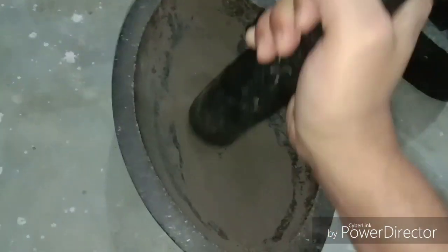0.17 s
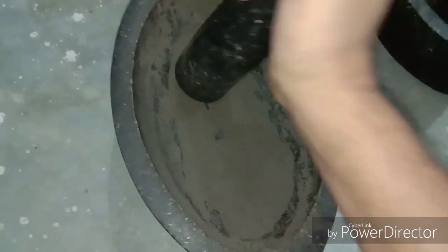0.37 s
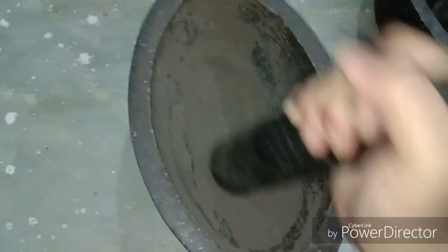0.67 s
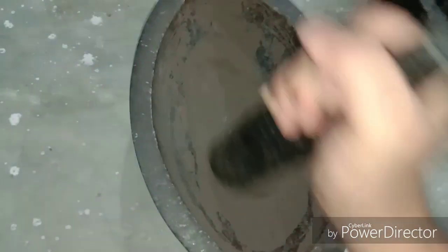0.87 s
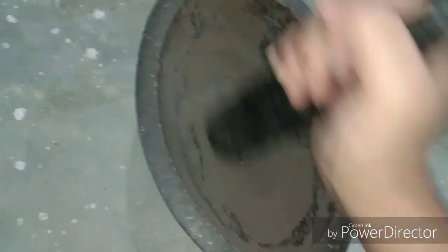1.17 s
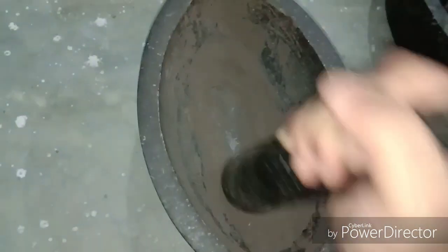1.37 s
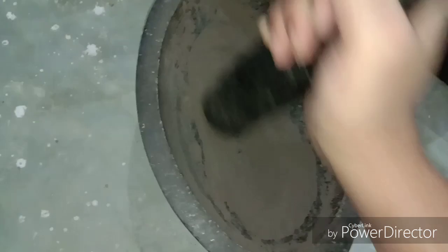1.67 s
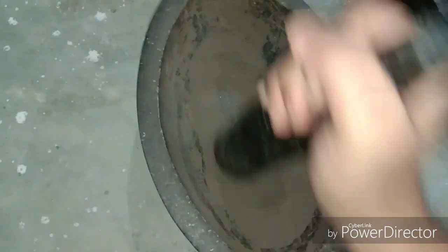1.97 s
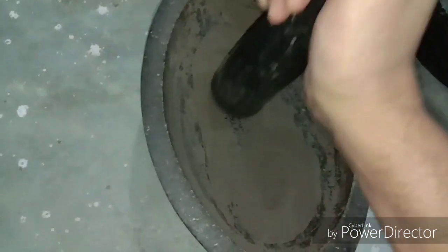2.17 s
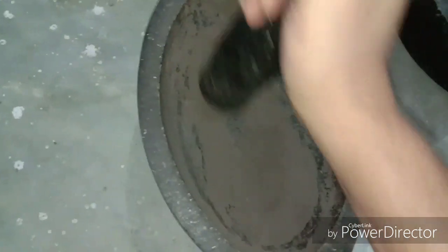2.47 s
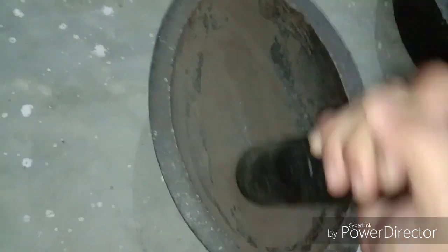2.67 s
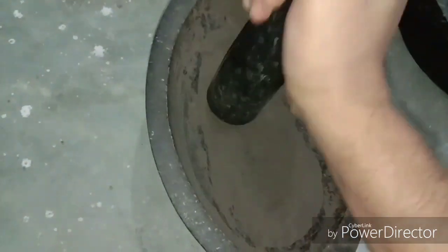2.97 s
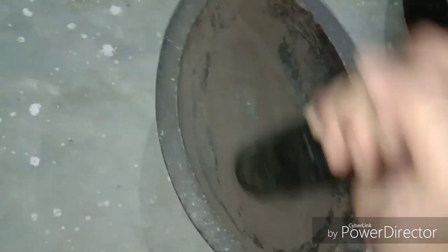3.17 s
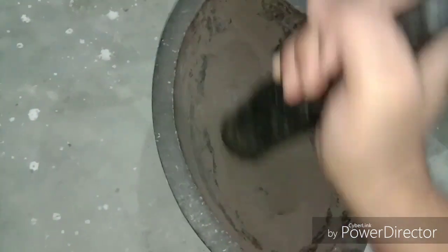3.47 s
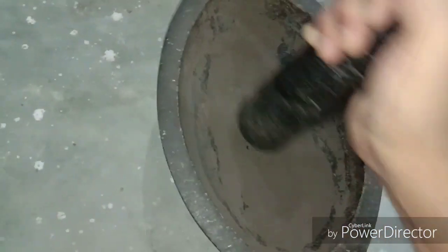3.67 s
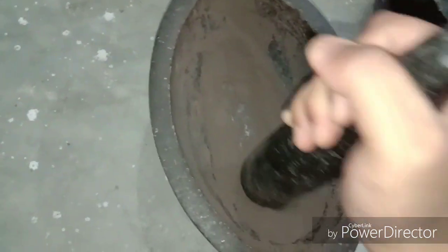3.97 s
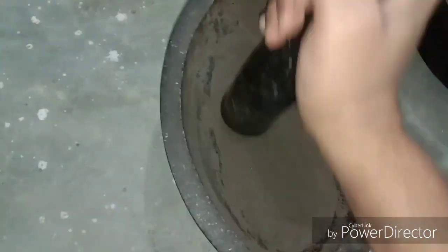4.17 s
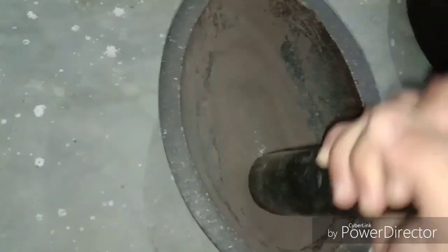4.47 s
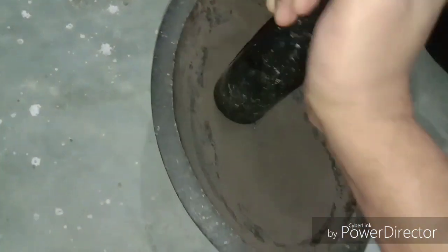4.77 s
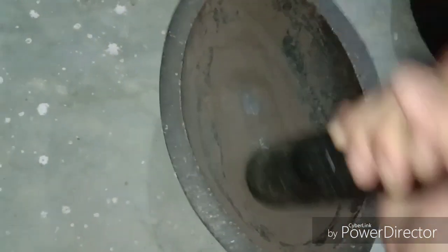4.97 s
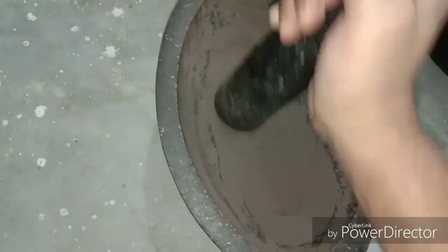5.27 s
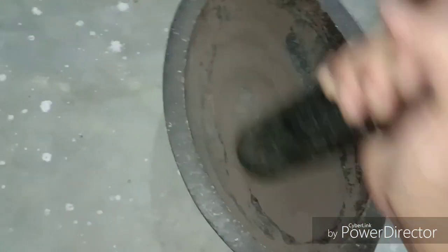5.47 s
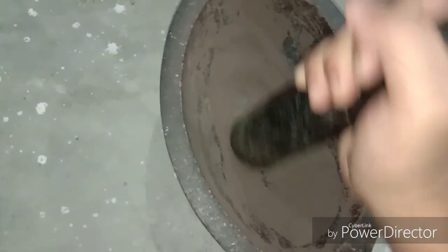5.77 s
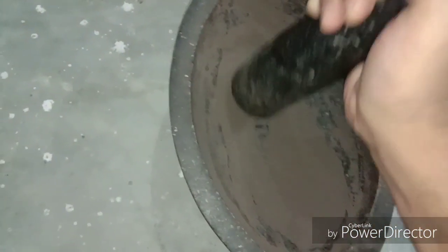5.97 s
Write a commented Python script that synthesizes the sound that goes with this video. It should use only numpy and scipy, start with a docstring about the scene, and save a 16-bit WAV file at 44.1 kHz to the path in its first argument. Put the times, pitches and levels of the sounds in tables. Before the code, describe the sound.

A heavy stone pestle scrapes to and fro through fine powder in a stone mortar, the bowl rumbling and knocking on the floor.

```python
"""In a small room with a hard floor, close to the microphones, a stone pestle works in a large stone mortar.
It goes to and fro through fine powder: dense random grains scrape, and drive resonances of the stone.
Bumps rumble through the heavy bowl, which also rocks and knocks, often in pairs, as short pushes with echoes.
Single low rings are decaying sines; a few grains snap and one airy hiss passes, both as shaped noise.
Behind lie a faint narrow band of high whine, thin tones that come and go, and a low hum."""
import sys
import numpy as np
from scipy import signal
from scipy.fft import rfft, irfft, next_fast_len
from scipy.io import wavfile
from scipy.ndimage import uniform_filter1d, map_coordinates

SR = 44100
rng = np.random.default_rng(int(sys.argv[2]) if len(sys.argv) > 2 else 0)


def transcribe(signal):
    """Save signal, clipped to [-1, 1], as a 16-bit WAV file at the path in sys.argv[1]."""
    frames = np.atleast_2d(signal).T
    limited = np.clip(frames, -1, 1)
    pcm = np.round(limited * 32767).astype(np.int16)
    wavfile.write(sys.argv[1], SR, pcm)


N = 269892  # length in samples

# landings of the rocking bowl on the floor; levels ahead of a common trim, and the hardness of
# the contact as a tilt of the upper range: [t/s, level/dB, hardness/dB]
BOWL_KNOCKS = [(1.04, -38, -14), (1.167, -31, -12), (1.214, -31, -14), (1.689, -30.5, -13.5),
               (1.738, -38, -2), (2.4265, -34.5, -3), (2.47, -40.5, -24.5), (2.612, -42.5, -16),
               (3.117, -29, 2.5), (3.165, -29.5, -12), (3.202, -33, -8.5), (4.315, -29, -3.5),
               (4.36, -29.5, -19.5), (4.875, -28.5, -7), (4.925, -30.5, -9.5), (5.452, -31, 6.5),
               (5.507, -29.5, -4.5)]
# low modes of bowl, floor and room, levels relative: [f/Hz, level/dB, t60/s]
LOW_MODES = [(118.5, 7, 1), (128, -10.5, 0.43), (160.5, 0.5, 0.95), (197, -23, 0.25), (233.4, 0, 0.44),
             (261.9, 5, 0.71), (296.5, -12, 0.15), (394.4, -8.5, 0.45), (503.8, -10.5, 0.22),
             (574.5, -4.5, 0.19), (645.4, -15, .25), (726, -12.5, 0.081)]
# strokes of the pestle, to and fro; t is the moment of full speed, levels ahead of the trims:
# [t/s, run-up/s, hold/s, scrape level/dB, coarse powder level/dB, boom level/dB, judder level/dB]
PESTLE_STROKES = [(0.108, 0.096, 0.066, -70, -86.5, -66.5, -62.5),
                  (0.665, 0.088, 0.091, -66.5, -82.5, -52, -54),
                  (0.943, 0.041, 0.084, -64.5, -74.5, -52.5, -54.5),
                  (1.203, .04, 0.094, -65.5, -78, -46, -51.5),
                  (1.497, 0.083, 0.093, -64.5, -73, -49.5, -51.5),
                  (1.747, 0.035, 0.099, -64, -73, -55, -51.5), (2.034, 0.071, 0.072, -65, -71, -50, -52.5),
                  (2.607, 0.11, 0.12, -64.5, -78, -58.5, -54.5),
                  (2.9, 0.044, 0.11, -64.5, -73.5, -49.5, -53.5), (3.165, 0.022, 0.1, -66, -75, -48, -49.5),
                  (3.467, 0.054, 0.099, -65.5, -75, -50, -53.5), (3.715, 0.091, .05, -100, -88, -82, -72),
                  (4.109, 0.12, 0.1, -65.5, -80, -60.5, -59), (4.391, 0.02, .085, -64, -73.5, -49.5, -51),
                  (4.655, 0.036, 0.13, -64, -71.5, -51.5, -53),
                  (4.927, 0.022, 0.14, -64.5, -73, -44.5, -53),
                  (5.217, 0.041, 0.11, -63.5, -73.5, -48.5, -52),
                  (5.485, 0.023, 0.13, -66.5, -74.5, -49.5, -50.5),
                  (5.786, 0.073, 0.093, -68, -76.5, -56, -56)]


def amp(db):
    """Decibels to gain."""
    return 10 ** (np.asarray(db) / 20)


def unit(x):
    """Scale to rms 1."""
    return x / np.sqrt(np.mean(x ** 2) + 1e-20)


def along(points, hz):
    """(Hz, value) points read on a log frequency axis."""
    f, v = np.transpose(points)
    return np.interp(np.log(hz + 1), np.log(f + 1), v)


def curves(rows):
    """One value per sample for each column after the time."""
    s, *cols = np.transpose(rows)
    return [np.interp(np.arange(N) / SR, s, c) for c in cols]


def wobble(rate):
    """A smooth random curve, rate knots a second."""
    knots = rng.standard_normal(int(N * rate / SR) + 4)
    return map_coordinates(knots, [np.arange(N) * rate / SR])


def filtered(x, response):
    """x with its spectrum multiplied by a response, a function of frequency."""
    m = next_fast_len(N + SR // 2)
    return irfft(rfft(x, m) * response(np.fft.rfftfreq(m, 1 / SR)), m)[..., :N]


def coloured(x, spectrum):
    """x shaped by a dB curve over frequency, at rms 1."""
    return unit(filtered(x, lambda hz: amp(along(spectrum, hz))))


def ringing(x, modes):
    """x through a set of (Hz, width Hz, dB) resonances side by side, at rms 1."""
    def response(f):
        return sum(amp(db) * 1j * f * width / (hz * hz - f * f + 1j * f * width) for hz, width, db in modes)
    return unit(filtered(x, response))


def pulse(gain_db):
    """The most compact causal pulse with the given dB spectrum (minimum phase, by the cepstrum)."""
    cepstrum = irfft(np.log(amp(gain_db)))
    half = len(cepstrum) // 2
    fold = np.r_[1, np.full(half - 1, 2), 1, np.zeros(half - 1)]
    return irfft(np.exp(rfft(cepstrum * fold)))


def grains(rate, scatter_db):
    """Tiny impacts at random moments, rate a second on average, of random sign and log-normal size."""
    struck = rng.random(N) < rate / SR
    sign = np.sign(rng.standard_normal(N))
    return unit(struck * sign * amp(scatter_db * rng.standard_normal(N)))


def steadied(x, span):
    """x with its swells longer than span seconds evened out."""
    power = uniform_filter1d(x ** 2, max(int(span * SR), 1))
    return x / np.sqrt(np.abs(power) + 1e-4)


def patchy(x, depth_db=4.5):
    """x with random patches of gain, a few hundred Hz wide and some 30 ms long, at rms 1."""
    z = signal.stft(x, nperseg=512)[2]
    across_pitch = uniform_filter1d(rng.standard_normal(z.shape), size=3, axis=0)
    field = uniform_filter1d(across_pitch, size=5, axis=1)
    return unit(signal.istft(z * amp(depth_db * unit(field)), nperseg=512)[1][:N])


def together(levels):
    """Unrelated sounds add in power."""
    return np.sqrt(sum(level ** 2 for level in levels) + 1e-20)


def swell(s, rise, hold, fall_db_per_s, sag_db_per_s=0, run_up_db=20):
    """A gain that climbs by run_up_db to 1 at time s, sags while held, then falls away."""
    gain = np.zeros(N)
    near = np.arange(max(int((s - .5) * SR), 0), min(int((s + 1) * SR), N))
    t = near / SR - s
    climb_db = run_up_db * np.minimum(t, 0) / rise
    sag_db = sag_db_per_s * np.maximum(t, 0)
    fall_db = fall_db_per_s * np.maximum(t - hold, 0)
    gain[near] = amp(climb_db - sag_db - fall_db)
    return gain


def tail():
    """Diffuse room sound: half a second of noise, each frequency dying at its own speed, of energy 1."""
    # how long the small room rings on: [f/Hz, t60/s]
    room_decay = [(120, 0.46), (300, 1), (800, 0.12), (4000, 0.21), (12000, 0.032)]
    hz, t, z = signal.stft(rng.standard_normal(SR // 2), SR, nperseg=256)
    fading = amp(-60 * t / along(room_decay, hz)[:, None])
    decay = signal.istft(z * fading, SR, nperseg=256)[1][:SR // 2]
    return decay / np.linalg.norm(decay)


def tone(hz, waver_hz, waver_rate, fade_db, fade_rate):
    """A thin sine of rms 1 whose pitch and level wander at random."""
    phase = 2 * np.pi * np.cumsum(hz + waver_hz * wobble(waver_rate)) / SR
    return unit(amp(fade_db * np.tanh(wobble(fade_rate))) * np.sin(phase))


def background(whine_db=-73.0, floor_db=-74.5):
    """Narrow-band noise for the high whine, wandering sines, and shaped noise for the room's low hum."""
    # colour of the high whine: [f/Hz, level/dB]
    whine_band = [(4800, -20.5), (5450, -18.5), (5700, -3), (5950, 0.5), (6160, 5), (6330, -2.5),
                  (6520, -11), (7000, -56)]
    # thin tones of nearly fixed pitch whose level comes and goes: [f/Hz, level/dB]
    thin_tones = [(164, -74.5), (1529, -100), (6162, -82.5), (15110, -99)]
    # faint high tones that flicker in and out: [f/Hz, level/dB]
    flickering_tones = [(2590, -101), (2780, -96), (2875, -100), (3060, -99), (3180, -96.5), (3225, -92.5),
                        (3350, -101)]
    # colour of the room's hum: [f/Hz, level/dB]
    room_floor = [(25, -41), (70, -15.5), (120, -1.5), (165, -6), (210, -15.5), (310, -25.5), (600, -28.5),
                  (1200, -34), (2200, -37), (3000, -38), (3600, -50), (5000, -46.5), (7000, -30.5),
                  (8500, -39), (14000, -38.5), (15200, -37.5)]
    whine = amp(whine_db + 1.2 * wobble(11.0)) * coloured(rng.standard_normal(N), whine_band)
    thin = sum(amp(db) * tone(hz, waver_hz=4, waver_rate=25, fade_db=7.5, fade_rate=7.8)
               for hz, db in thin_tones)
    flicker = sum(amp(db) * tone(hz, waver_hz=32.7, waver_rate=130, fade_db=11, fade_rate=16)
                  for hz, db in flickering_tones)
    hum = amp(floor_db) * coloured(rng.standard_normal(N), room_floor)
    return whine + thin + flicker + hum


def hiss():
    """One light, ragged, very high hiss early on: two bands of patchy noise under drawn levels."""
    # course of the hiss: [t/s, body level/dB, sizzle level/dB]
    hiss_course = [(.5, -115, -120), (.54, -80.5, -105), (.66, -81, -82), (.71, -75, -59.5),
                   (.76, -73.5, -58), (.81, -81, -73), (.88, -86, -103), (.95, -115, -120)]
    # colour of its body: [f/Hz, level/dB]
    airy_band = [(5000, -31), (7000, -10), (8100, -2), (8900, -12.5), (10400, -20), (11500, -35),
                 (13000, -12), (15000, -48)]
    # colour of its sizzle: [f/Hz, level/dB]
    sizzle_band = [(11500, -30), (13100, -27), (13400, -29), (14500, -4), (15200, -9)]
    body_db, sizzle_db = curves(hiss_course)
    body = amp(body_db) * patchy(coloured(rng.standard_normal(N), airy_band))
    sizzle = amp(sizzle_db) * patchy(coloured(rng.standard_normal(N), sizzle_band))
    return body + sizzle


def snaps(t60=0.048):
    """A single hard grain bursts under the tip: a short spray of noise that starts at once and dies (t60 in s)."""
    # moments of bursting: [t/s, level/dB]
    bursts = [(2.042, -60), (4.68, -59), (5.342, -62)]
    # colour of the spray: [f/Hz, level/dB]
    spray_colour = [(1500, -29), (3500, -6), (4400, 4), (5400, 3), (6700, 11), (7300, -10), (8200, -33),
                    (14000, -35)]
    t = np.arange(N) / SR
    level = sum((t >= s) * amp(db - 60 * np.abs(t - s) / t60) for s, db in bursts)
    return level * coloured(rng.standard_normal(N), spray_colour)


def low_rings(attack_cycles=0.55):
    """Single low rings: each is one decaying sine with a rounded onset."""
    # from faint nudges to a short strong thump that is part of the knock at 2.43 s:
    # [t/s, level/dB, f/Hz, t60/s]
    single_rings = [(0.113, -48.5, 127, 0.26), (0.488, -46.5, 119.2, 0.58), (0.523, -48.5, 403, 0.082),
                    (0.656, -39.5, 310, 0.043), (0.941, -50.5, 249, 0.061), (1.497, -35.5, 130.4, 0.27),
                    (2.042, -39.5, 129, 0.55), (2.403, -43.5, 122, 0.23), (2.429, -24, 342, 0.025),
                    (3.505, -43, 126, 0.29), (3.972, -44.5, 128.3, 0.77), (3.983, -52.5, 323.5, 0.32)]
    out, t = np.zeros(N + SR), np.arange(SR // 2) / SR
    for s, db, hz, t60 in single_rings:
        onset = (1 - np.exp(-t * hz / attack_cycles)) ** 2
        out[round(s * SR):][:len(t)] += amp(db - 60 * t / t60) * onset * np.sin(2 * np.pi * hz * t)
    return out[:N]


def knock(hardness_db, ring_db=-40, room_db=-6, hard_hz=800, soft_hz=220, usual_db=-12):
    """One blow of peak 1: a short push, its echoes off near surfaces, the low modes and the room."""
    # nearby surfaces, gain relative to the direct sound: [delay/s, gain]
    near_surfaces = [(.0031, 0.69), (.0082, 0.51), (.0155, 0.31), (.0232, 0.11), (.031, .22), (.0385, 0.1)]
    # colour of the push at usual hardness: [f/Hz, level/dB]
    thud_colour = [(30, -26.5), (70, -19), (120, -9.5), (260, 3), (450, 6.5), (720, 2), (880, -1),
                   (1050, -34), (1400, -43.5), (2200, -54), (4000, -81)]
    t = np.arange(SR // 2) / SR
    answer = amp(room_db) * tail() * (1 - np.exp(-t / 0.0074))  # the diffuse sound builds up
    for hz, db, t60 in LOW_MODES:
        strength = amp(ring_db) * amp(db + rng.normal(0, 1.8) - 60 * t / t60)
        answer += strength * np.cos(2 * np.pi * hz * t)
    answer[0] += 1  # direct sound
    for delay, gain in near_surfaces:
        answer[round(delay * SR)] += gain
    hz = np.fft.rfftfreq(4096, 1 / SR)
    # a softer contact lasts longer and loses its upper range
    tilt_db = along([(soft_hz, 0), (hard_hz, hardness_db - usual_db)], hz)
    push = pulse(along(thud_colour, hz) + tilt_db)
    blow = signal.fftconvolve(answer, push)[:len(t)]
    return blow / np.abs(blow).max()


def rocking(knock_db=-1.5, lag=.002):
    """The bowl tips and lands on the floor: one blow for each landing."""
    out = np.zeros(N + SR)
    for s, db, hardness_db in BOWL_KNOCKS:
        blow = amp(db + knock_db) * knock(hardness_db)
        out[round((s + lag) * SR):][:len(blow)] += blow
    return out[:N]


def tipping(dip_db=9, lead=0.0012, length=0.012):
    """Gain of the rumble: the bowl is off the floor for an instant around each knock (lead, length in s)."""
    t = np.arange(N) / SR
    lifted = sum(np.exp(-((t - s + lead) / length) ** 2) for s, db, hardness_db in BOWL_KNOCKS)
    return amp(-dip_db * lifted)


def shaking(spectrum, ring_db):
    """Bumps of the tip, heard directly and through the low modes."""
    bumps = grains(rate=700, scatter_db=3.0)
    modes = [(hz, np.log(1000) / np.pi / t60, db) for hz, db, t60 in LOW_MODES]  # t60 to width in Hz
    through_bowl = amp(ring_db) * coloured(ringing(bumps, modes), spectrum)
    return steadied(coloured(bumps, spectrum) + through_bowl, span=0.027)


def pressing(turn_dip_db=3.5, turn_half_s=0.034, press_on_s=0.012, shudder_rise_s=0.012):
    """Levels of boom and judder: every stroke and every drop of weight shakes the bowl."""
    # the arm's weight drops on the bowl and leaves it shuddering, levels ahead of the trims:
    # [t/s, hold/s, boom level/dB, judder level/dB]
    weight_drops = [(0.503, 0.093, -58.5, -65), (1.062, 0.075, -50.5, -55), (1.167, 0.098, -53, -47),
                    (1.676, 0.077, -47, -46.5), (2.425, 0.02, -43.5, -44.5), (3.108, 0.07, -46, -41),
                    (3.967, 0.023, -54.5, -61.5), (4.297, 0.14, -46.5, -44.5), (4.886, 0.084, -48, -44),
                    (5.442, 0.078, -49, -41.5), (5.872, 0.016, -58.5, -71)]
    ease_db_per_s, settle_db_per_s = 112.5, 87.5  # fall of the judder after a stroke, after a drop
    boom_lingers = 1.47  # the boom takes this many times longer to die than the judder
    t = np.arange(N) / SR
    # the pestle stands still for an instant before each stroke
    still = sum(np.exp(-((t - s + rise) / turn_half_s) ** 2) for s, rise, *_ in PESTLE_STROKES)
    moving = amp(-turn_dip_db * still)
    booms, judders = [], []
    for s, rise, hold, _, _, boom_db, judder_db in PESTLE_STROKES:
        pressed = hold + press_on_s  # the arm keeps pressing a little longer
        booms.append(amp(boom_db) * moving * swell(s, rise, pressed, ease_db_per_s / boom_lingers))
        judders.append(amp(judder_db) * moving * swell(s, rise, pressed, ease_db_per_s))
    for s, hold, boom_db, judder_db in weight_drops:
        full = s + shudder_rise_s
        booms.append(amp(boom_db) * swell(full, shudder_rise_s, hold, settle_db_per_s / boom_lingers))
        judders.append(amp(judder_db) * swell(full, shudder_rise_s, hold, settle_db_per_s))
    return together(booms), together(judders)


def rumble(boom_db=-1.5, judder_db=-3, chatter_db=-54, heavy_db=-43, steepness=1.4):
    """The pestle bumps over the uneven stone; the harder it is pressed, the brighter the bowl shakes."""
    # colour of the boom: [f/Hz, level/dB]
    boom_colour = [(25, -41), (50, -39.5), (85, -23), (105, -13), (122, 3), (145, -6), (165, -2.5),
                   (200, -8.5), (280, -20.5), (600, -91)]
    # colour of the judder: [f/Hz, level/dB]
    judder_colour = [(120, -28.5), (190, -7.5), (255, -3), (330, -3.5), (450, -9.5), (600, -20.5),
                     (760, -39.5), (950, -39), (1500, -80)]
    # colour of the brighter chatter: [f/Hz, level/dB]
    chatter_colour = [(250, -32), (390, 5), (580, 0), (740, -12), (880, -26.5), (1000, -30), (1500, -52)]
    boom_level, judder_level = pressing()
    bumps = coloured(grains(rate=330, scatter_db=3.5), boom_colour)
    boom = amp(boom_db) * boom_level * steadied(bumps, span=0.035)
    judder = amp(judder_db) * judder_level * shaking(judder_colour, ring_db=1.0)
    chatter_level = amp(chatter_db) * (judder_level / amp(heavy_db)) ** steepness
    chatter = chatter_level * shaking(chatter_colour, ring_db=-8.0)
    return tipping() * (boom + judder + chatter)


def stone_modes(modes, wander_db, catch_db):
    """Grit rings each mode; their strengths shift as the tip travels over the bowl."""
    out = 0
    for hz, width, db in modes:
        resonance = lambda f: (1j * f * width / (hz * hz - f * f + 1j * f * width)) ** 2
        ring = unit(filtered(grains(rate=5000, scatter_db=5.0) * amp(catch_db), resonance))
        out = out + amp(db + wander_db * wobble(16)) * ring
    return steadied(unit(out), span=0.096)


def sliding(stop_db_per_s=200, sag_db_per_s=16, coarse_lag=0.16, coarse_half_s=0.065, coarse_edge=4.7):
    """Levels of the tip, swelling with speed, and of the coarse powder it ploughs through in mid-stroke."""
    t = np.arange(N) / SR
    slides, coarses = [], []
    for s, rise, hold, scrape_db, coarse_db, *_ in PESTLE_STROKES:
        slides.append(amp(scrape_db) * swell(s, rise, hold, stop_db_per_s, sag_db_per_s))
        heap_s = s + hold / 2 + coarse_lag * rise  # just after mid-stroke, by a share of the run-up
        from_heap = np.abs(t - heap_s) / coarse_half_s
        coarses.append(amp(coarse_db) / (1 + from_heap ** coarse_edge))  # the edge sets how abruptly
    uneven = amp(1.4 * wobble(30))  # the powder lies unevenly, so the scrape stutters
    return uneven * together(slides), uneven * together(coarses)


def scrape(stone_db=0, high_db=-6, powder_db=-6, crunch_db=8.5, room_db=-13):
    """Powder breaks under the sliding tip: dense grains, heard directly and through the stone's modes."""
    # ringing of the stone: [f/Hz, width/Hz, level/dB]
    main_ring = [(2496, 27, -31.5), (2690, 360, -34.5), (3345, 56, -23.5), (3700, 40, -23.5),
                 (4060, 107, -6), (4414, 188, -1.5), (4780, 390, -14)]
    # its upper modes, woken by coarse powder: [f/Hz, width/Hz, level/dB]
    upper_ring = [(6650, 37, -2.5), (7290, 74, -10.5), (7487, 65, -4), (9010, 120, -25), (9530, 250, -20.5),
                  (10300, 200, -26)]
    # colour of the breaking powder: [f/Hz, level/dB]
    powder_colour = [(1500, -8), (2400, -10.5), (3600, -14), (4000, -15), (4700, -1), (5300, 12.5),
                     (6300, 16), (7200, -11), (8100, -9), (11000, -26), (15500, -1.5)]
    # colour of the lower crunch: [f/Hz, level/dB]
    crunch_colour = [(250, -17), (500, -3.5), (820, 6), (980, -9.5), (1170, -5), (1400, -16.5),
                     (1900, -28.5), (2400, -22.5), (3500, -34), (6000, -90)]
    slide, coarse = sliding()
    grit = np.sqrt(slide * (coarse + amp(-24.5) * slide))  # sharp breaks need both speed and coarse powder
    catch_db = 1.9 * wobble(70)  # the tip catches and lets go

    def breaks():
        """A fresh run of breaking grains that follows the catching tip."""
        return grains(rate=3000, scatter_db=3) * amp(catch_db / 2)

    stone = amp(stone_db) * slide * stone_modes(main_ring, wander_db=2.5, catch_db=catch_db)
    high = amp(high_db) * grit * stone_modes(upper_ring, wander_db=4.5, catch_db=catch_db)
    powder = amp(powder_db) * grit * coloured(breaks(), powder_colour)
    # the contact patch keeps changing
    crunch = amp(crunch_db) * coarse * patchy(coloured(breaks(), crunch_colour))
    close = stone + high + powder + crunch
    return close + amp(room_db) * signal.fftconvolve(close, tail())[:N]


def scene(self_noise_db=-84):
    """Every source is central; diffuse sound and microphone noise give a trace of width."""
    # width of the diffuse sound, side over mid: [f/Hz, level/dB]
    side_width = [(30, -21), (70, -41), (130, -62), (350, -69), (700, -45), (1500, -22), (3000, -14),
                  (4300, -23.5), (6200, -17), (8500, -21), (14000, -36)]
    # colour of the noise that differs between the two microphones: [f/Hz, level/dB]
    microphone_noise = [(18, -49), (30, -19), (102, -15.5), (222, -20.5), (524, -9), (1780, -14.5),
                        (6040, -14.5), (8040, -21), (15000, -18.5)]
    mid = background() + hiss() + snaps() + low_rings() + rocking() + rumble() + scrape()
    diffuse = signal.fftconvolve(mid, tail())[:N]
    side = filtered(diffuse, lambda hz: amp(along(side_width, hz)))
    side += amp(self_noise_db) * coloured(rng.standard_normal(N), microphone_noise)
    return np.array([mid + side, mid - side])


def record(dry, top_hz=15550):
    """The recorder keeps nothing above its band limit."""
    return filtered(dry, lambda hz: hz < top_hz)


dry = scene()
out = record(dry)
transcribe(out)
```